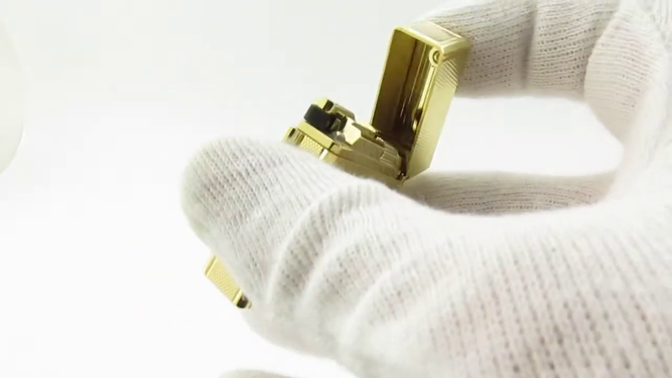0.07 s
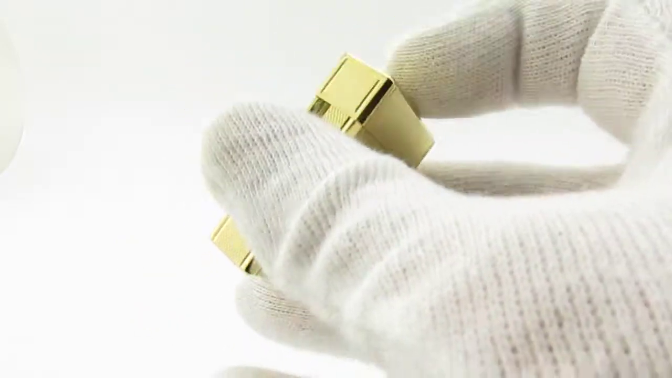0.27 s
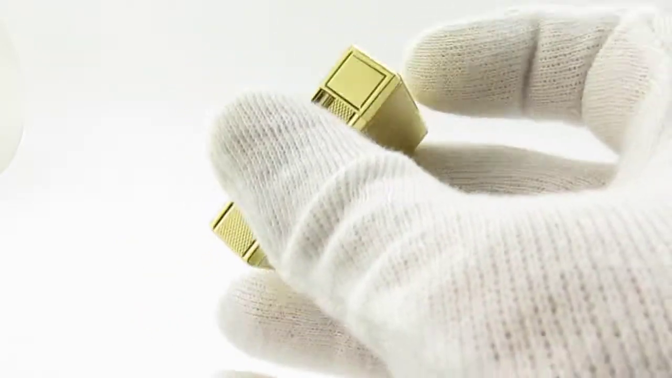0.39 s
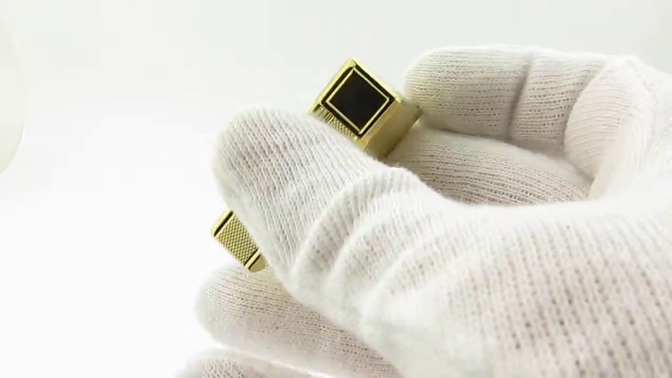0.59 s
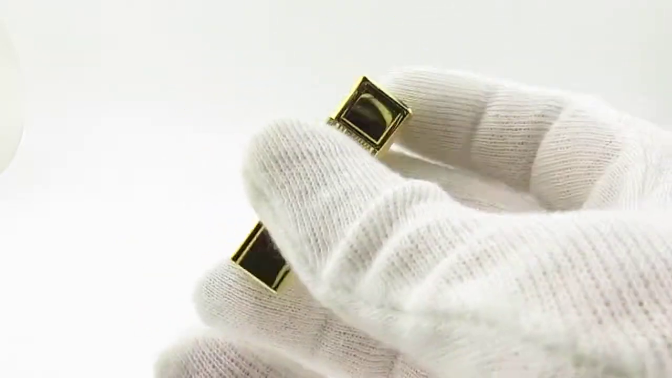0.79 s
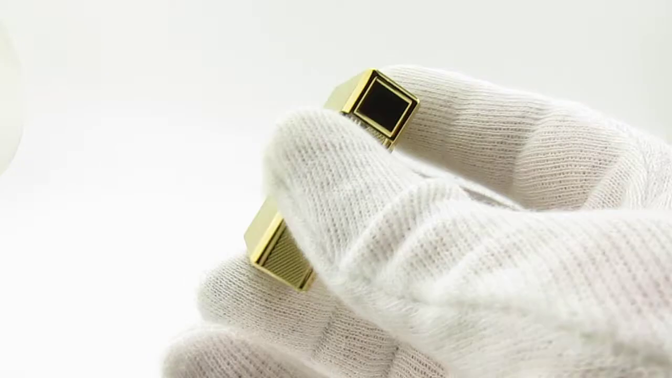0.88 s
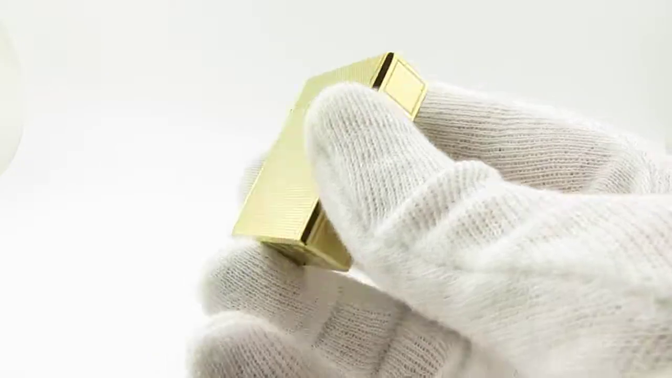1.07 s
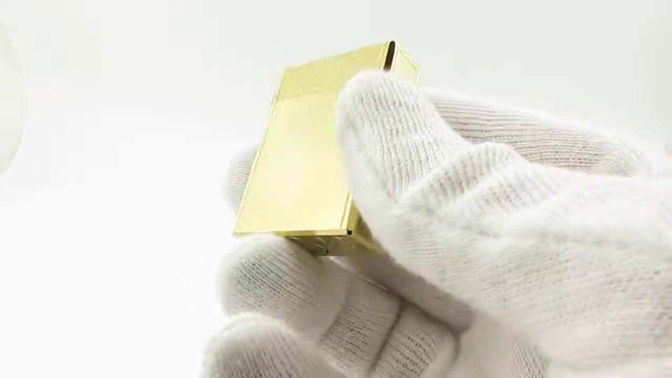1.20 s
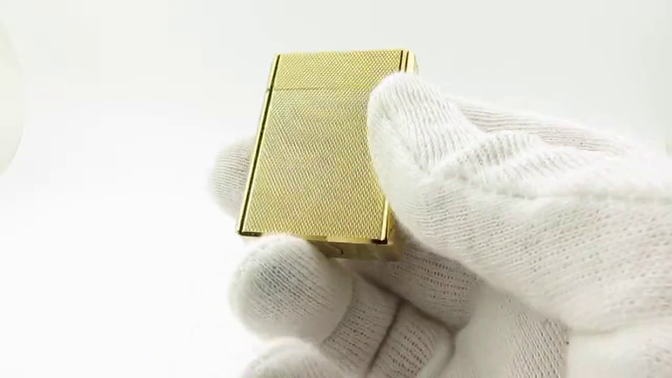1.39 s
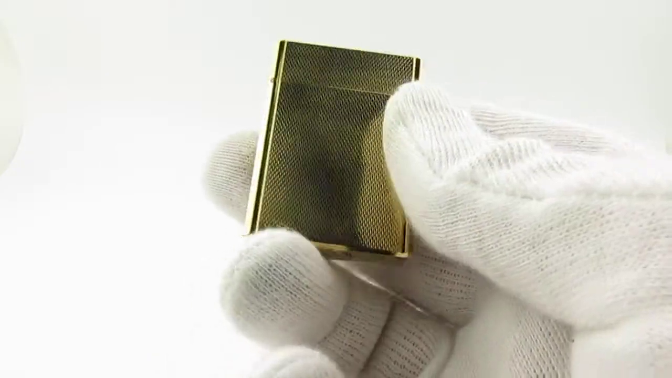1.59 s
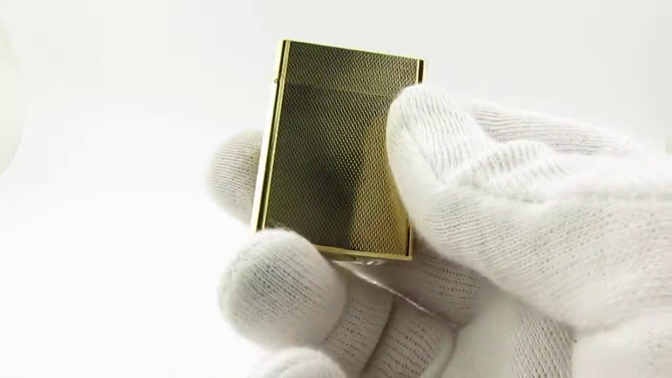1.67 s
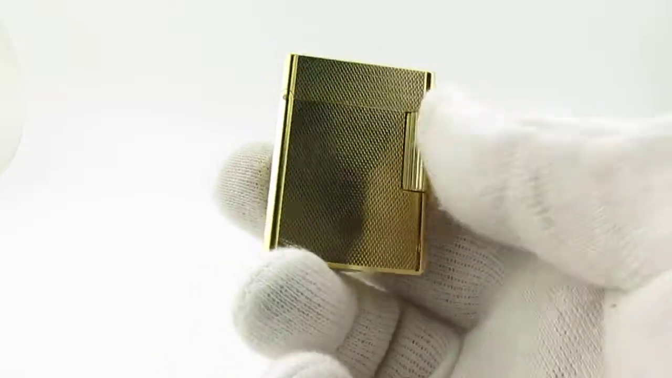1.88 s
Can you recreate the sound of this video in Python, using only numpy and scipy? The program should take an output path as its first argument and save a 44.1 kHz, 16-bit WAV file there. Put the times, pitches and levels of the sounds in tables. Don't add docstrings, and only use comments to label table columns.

```python
import sys
import numpy as np
from scipy import signal
from scipy.fft import rfft, irfft
from scipy.io import wavfile
from scipy.ndimage import uniform_filter1d

SR = 44100
rng = np.random.default_rng(int(sys.argv[2]) if len(sys.argv) > 2 else 0)


def decibels_to_gain(level_db):
    exponent = np.asarray(level_db, float) / 20
    return 10 ** exponent


def wav_record(signal):
    frames = np.transpose(np.atleast_2d(signal))
    bounded = np.clip(frames, -1, 1)
    quanta = np.round(bounded * 32767).astype(np.int16)
    wavfile.write(sys.argv[1], SR, quanta)


N = 85995
TIME_S = np.arange(N) / SR
LEFT_RIGHT = np.array([[1], [-1]])


def unit(x):
    return x / np.sqrt(np.mean(x ** 2))


def colour(x, points):
    hz, db = np.array(points, float).T
    n = x.shape[-1] // 2 * 2
    f = np.arange(n // 2 + 1) * SR / n + 1
    log_gain = np.interp(np.log(f), np.log(hz), db) * np.log(10) / 20
    cepstrum = irfft(log_gain, n)
    fold = np.where(np.arange(n) < n // 2, 2., 0.)
    fold[0] = 1
    response = np.exp(rfft(cepstrum * fold))
    out = irfft(rfft(x, n) * response, n)
    return np.pad(out, [(0, 0)] * (x.ndim - 1) + [(0, x.shape[-1] - n)], "edge")


def fade(start_s, t60_s):
    t = TIME_S - start_s
    return (t >= 0) * np.exp(-np.log(1000) * np.maximum(t, 0) / t60_s)


def walk(rate_hz):
    k = int(SR / rate_hz)
    steps = np.repeat(rng.standard_normal(N // k + 1), k)
    return unit(uniform_filter1d(uniform_filter1d(steps, k), k)[:N])


def band(x, hz, width_hz):
    return signal.lfilter(*signal.iirpeak(hz, hz / width_hz, fs=SR), x)


def butter2(x, hz, kind="low"):
    return signal.sosfilt(signal.butter(2, hz, kind, fs=SR, output="sos"), x)


# frequency in Hz, density in dB per Hz.
AIR_SPECTRUM = [(15, -38.5), (25, -10), (164, -6.5), (209, -5.5), (246, -10.5), (566, -17), (4740, -29),
                (10300, -30), (15500, -33)]
# time in seconds, level in dB.
RUMBLE_SWELL = [(0, 5), (0.201, 0.5), (.8, -0.5), (1.05, 0), (1.32, 1.5), (1.45, -1), (1.57, -0.5),
                (1.7, -1.5), (1.9, 1)]
# frequency in Hz, width in Hz, level in dB.
DRONES = [(48, 11, -60.5), (210, 11, -68), (247, 18, -71.5), (291.7, 12, -72)]
AIR_DB, AIR_FLICKER_DB, AIR_FLICKER_HZ = -58, 0.25, 9


def air():
    noise = unit(colour(rng.standard_normal((2, N)), AIR_SPECTRUM))
    rumble = butter2(noise, 500)
    hiss = noise - rumble
    swell = decibels_to_gain(np.interp(TIME_S, *np.array(RUMBLE_SWELL).T))
    drone = 0
    for hz, width_hz, db in DRONES:
        drone = drone + decibels_to_gain(db) * unit(band(rng.standard_normal((2, N)), hz, width_hz))
    flicker = decibels_to_gain(AIR_FLICKER_DB * walk(AIR_FLICKER_HZ))
    return decibels_to_gain(AIR_DB) * (hiss + rumble * swell * flicker) + swell * drone


# time in seconds, level in dB, frequency in Hz.
CATCHES = [
    (.158, -62, 1000),
    (.752, -62.5, 9000),
    (1.437, -58, 1100),
    (1.509, -56.5, 10000),
    (1.826, -62, 6985),
]
CATCH_T60_S = 0.013


def fibre_catches():
    out = 0
    for start_s, db, hz in CATCHES:
        tick = unit(band(rng.standard_normal(N), hz, 0.45 * hz))
        out = out + decibels_to_gain(db) * fade(start_s, CATCH_T60_S) * tick
    return out


# start in seconds, length in seconds, level in dB.
SLIDES = [
    (-.05, 0.3, -73),
    (.68, .085, -66.5),
    (1.022, 0.3, -75),
    (1.472, 0.175, -74),
    (1.8, .25, -70.5),
]
# frequency in Hz, density in dB per Hz.
RUSTLE_SPECTRUM = [(300, -30), (3000, -13), (7000, -5.5), (9500, 1.5), (12500, -2.5), (14500, -9.5),
                   (17000, -17)]
SLIDE_EDGE_S, GRAIN_DB, GRAIN_HZ = 0.016, 0.64, 120
WHISTLE_HZ, WHISTLE_WIDTH_HZ, WHISTLE_DB = 12800, 250, -76


def glove():
    slide = 0
    for start_s, length_s, db in SLIDES:
        to_edge_s = np.minimum(TIME_S - start_s, start_s + length_s - TIME_S)
        slide = slide + decibels_to_gain(db) * np.clip(to_edge_s / SLIDE_EDGE_S, 0, 1)
    friction = rng.standard_normal((2, N))
    mid, diff = friction
    cotton = unit(colour(mid + 0.26 * diff * LEFT_RIGHT, RUSTLE_SPECTRUM))
    rustle = slide * decibels_to_gain(GRAIN_DB * walk(GRAIN_HZ)) * cotton
    whistle = decibels_to_gain(WHISTLE_DB) * unit(band(friction, WHISTLE_HZ, WHISTLE_WIDTH_HZ))
    return rustle + (TIME_S < CONTACTS[0][0]) * whistle + fibre_catches()


ROOM_DB, ROOM_LOW_HZ, ROOM_TOP_HZ = -15.5, 1100, 9000
ROOM_T60_S, ROOM_TOP_T60_S = 0.49, 0.35


def room(x):
    noise = rng.standard_normal((2, N))
    low = butter2(noise, ROOM_TOP_HZ)
    tail = low * fade(0.0083, ROOM_T60_S) + (noise - low) * fade(0.011, ROOM_TOP_T60_S)
    tail = butter2(tail[:, :SR], ROOM_LOW_HZ, "high")
    tail = tail / np.sqrt(np.sum(tail ** 2) / 2)
    return decibels_to_gain(ROOM_DB) * signal.fftconvolve(x, tail, axes=1)[:, :N]


SIDES_DB, SIDES_RAD = 4.5, .8
RING_S = .6
RING_LOW_CUT_HZ = 1200


def ring(modes, start_s):
    first = int(start_s * SR) + 1
    t = (first + np.arange(int(RING_S * SR))) / SR - start_s
    out = np.zeros((2, N))
    for k, (hz, db, t60_s) in enumerate(modes):
        level_side, phase_side = rng.uniform(-1, 1, 2)
        level = decibels_to_gain(db + SIDES_DB * level_side * LEFT_RIGHT)
        phase = np.pi * (k + 1) + SIDES_RAD * phase_side * LEFT_RIGHT
        decay = np.exp(-np.log(1000) * t / t60_s)
        out[:, first:first + len(t)] += level * decay * np.sin(2 * np.pi * hz * t + phase)
    return butter2(out, RING_LOW_CUT_HZ, "high") / np.sqrt(len(modes))


# frequency in Hz, level in dB, T60 in seconds.
CASE_MODES = [(1950, -14, .25), (4530, -5, .55), (4570, -8, .5), (4613, -11, .45), (8500, -7, .33),
              (8370, -9, .35), (8530, -7.5, .33), (13000, -11, 0.21), (14500, -4, .27), (14200, -6, .27)]
CASE_DB = -17.5


def case_ring(start_s, grip):
    return decibels_to_gain(CASE_DB) * grip * ring(CASE_MODES, start_s)


THUD_HZ, THUD_DB, THUD_T60_S = 342, -21, 0.036


def thud(start_s):
    return decibels_to_gain(THUD_DB) * fade(start_s, THUD_T60_S) * np.sin(2 * np.pi * THUD_HZ * (TIME_S - start_s))


# frequency in Hz, density in dB per Hz.
RATTLE_SPECTRUM = [(500, -45), (2000, -13), (4100, -16), (4500, -5), (5500, -15), (7650, -11.5), (8460, -3),
                   (15500, -5)]
RATTLE_DB, RATTLE_T60_S = 3, .08


def rattle(start_s):
    mid, diff = rng.standard_normal((2, N))
    noise = (mid + 0.76 * diff * LEFT_RIGHT) * fade(start_s, RATTLE_T60_S)
    return decibels_to_gain(RATTLE_DB) * colour(noise, RATTLE_SPECTRUM)


# frequency in Hz, density in dB per Hz.
CRACK_SPECTRUM = [(40, -30), (350, -24), (800, -25), (1300, -12), (2400, -5), (3600, -11), (5500, -6),
                  (15500, -8)]
# frequency in Hz, width in Hz, level in dB.
BLOW_RESONANCES = [(2150, 1800, -15), (4643, 440, -7.5), (6026, 360, -8.5), (6550, 400, -13),
                   (8540, 480, -6), (10904, 360, -4.5), (12120, 580, -11.5), (14868, 390, -1)]
# frequency in Hz, level in dB, T60 in seconds.
LID_MODES = [(4556, -2.5, 0.081), (6100, -10, .07), (8610, -2, 0.087), (9840, -3.5, 0.074),
             (10470, -5, .06), (11330, -6.5, .05), (12980, -5, .08), (14300, -4.5, .07), (14460, 0.5, .08),
             (15020, -4, .07)]
CRACK_DB, CRACK_T60_S, BLOW_DB, SNAP_DB, LID_DB = 4.5, .014, 22, 21.5, .5


def contact(start_s):
    mid, diff = rng.standard_normal((2, N))
    crack = decibels_to_gain(CRACK_DB) * (mid + 0.24 * diff * LEFT_RIGHT) * fade(start_s, CRACK_T60_S)
    blow = decibels_to_gain(BLOW_DB) * np.sinc(np.arange(N) - start_s * SR)
    snap_modes = []
    for hz, width_hz, db in BLOW_RESONANCES:
        t60_s = np.log(1000) / np.pi / width_hz
        snap_modes.append((hz, db + 20 * np.log10(width_hz / 500), t60_s))
    snap = decibels_to_gain(SNAP_DB) * ring(snap_modes, start_s)
    return colour(crack + blow, CRACK_SPECTRUM) + snap + decibels_to_gain(LID_DB) * ring(LID_MODES, start_s)


# time in seconds, level in dB.
CONTACTS = [
    (0.2083, -1),
    (.2117, -12),
    (0.2167, -16),
]
WAVER_DB, WAVER_HZ = 3, 50


def lid():
    grip = decibels_to_gain(WAVER_DB * walk(WAVER_HZ))
    out = 0
    for start_s, db in CONTACTS:
        out = out + decibels_to_gain(db) * contact(start_s)
    shut_s = CONTACTS[0][0]
    return out + rattle(shut_s) + thud(shut_s) + case_ring(shut_s, grip)


def scene():
    snap = lid()
    return snap + room(snap) + air() + glove()


def top_cut(x):
    return signal.sosfilt(signal.butter(12, 15620, fs=SR, output="sos"), x)


DUCK_DB, DUCK_ATTACK_S, DUCK_HOLD_S = 20.5, 0.0027, .08
RECOVER_DB_PER_S, SETTLE_DB = 20.5, 7.5
TOP_HZ = 15550


def record(dry):
    t = TIME_S - CONTACTS[0][0]
    left_db = DUCK_DB - RECOVER_DB_PER_S * np.maximum(t - DUCK_HOLD_S, 0)
    attack = 1 - np.exp(-np.maximum(t, 0) / DUCK_ATTACK_S)
    duck_db = SETTLE_DB * np.logaddexp(0, left_db / SETTLE_DB) * attack
    clipped = 1.21 * np.tanh(dry * decibels_to_gain(-duck_db) / 0.99)
    low_pass = signal.ellip(6, .1, 30, TOP_HZ, fs=SR, output="sos")
    mix = np.clip(signal.sosfiltfilt(low_pass, clipped), -1, 1)
    return top_cut(mix)


dry = scene()
out = record(dry)
wav_record(out)
```